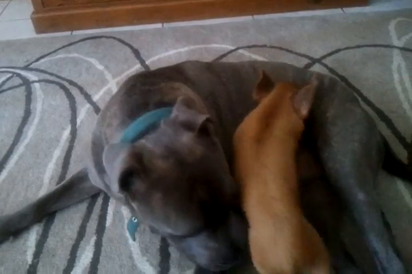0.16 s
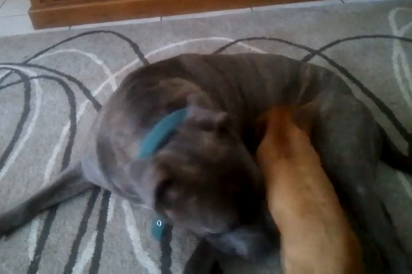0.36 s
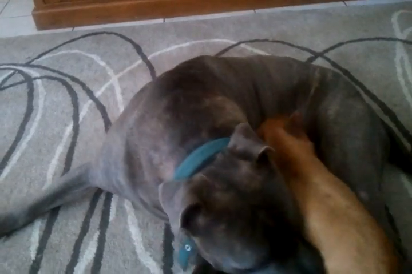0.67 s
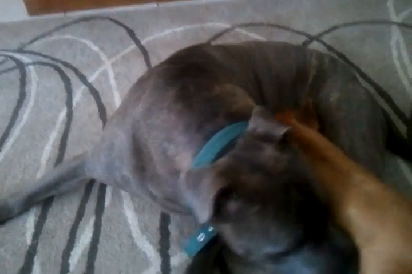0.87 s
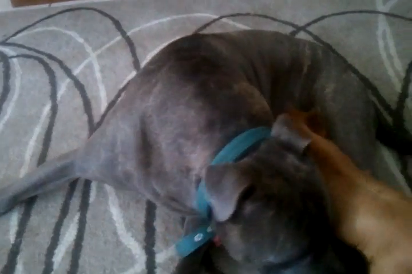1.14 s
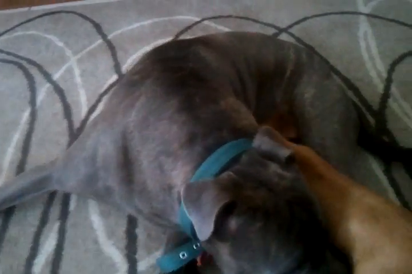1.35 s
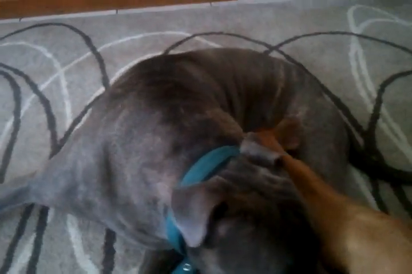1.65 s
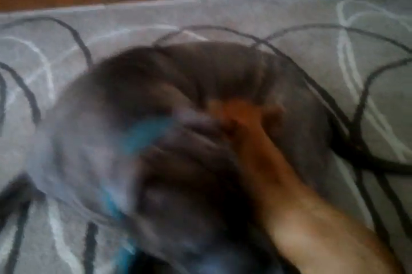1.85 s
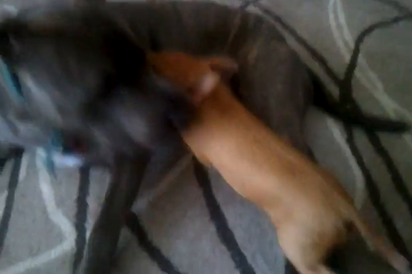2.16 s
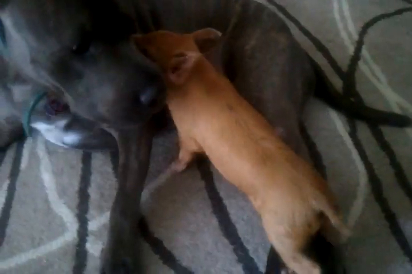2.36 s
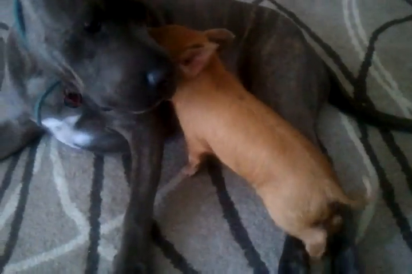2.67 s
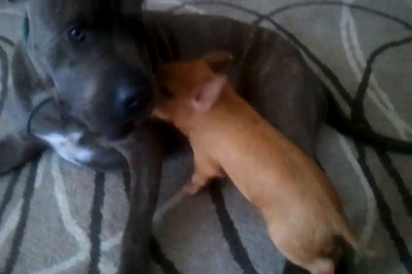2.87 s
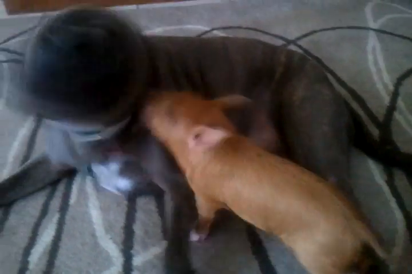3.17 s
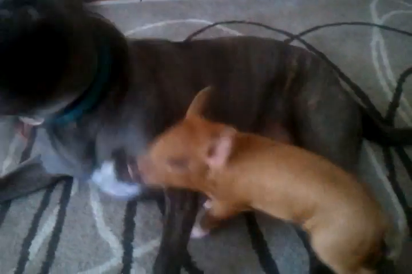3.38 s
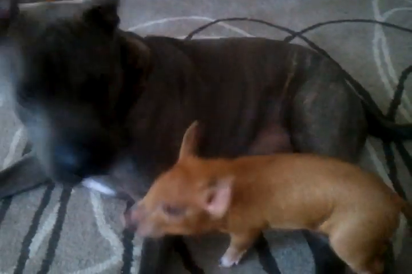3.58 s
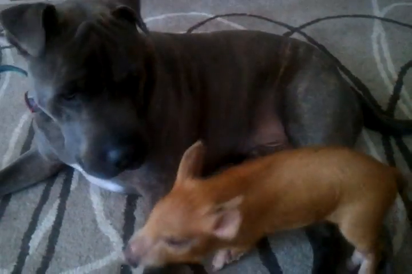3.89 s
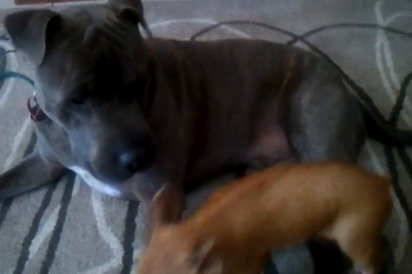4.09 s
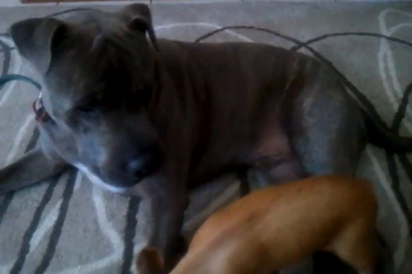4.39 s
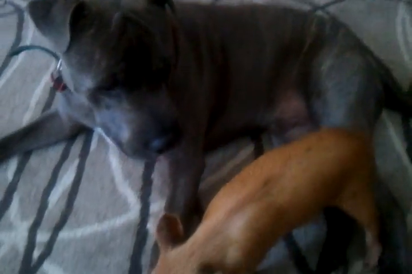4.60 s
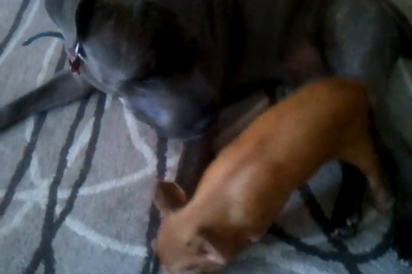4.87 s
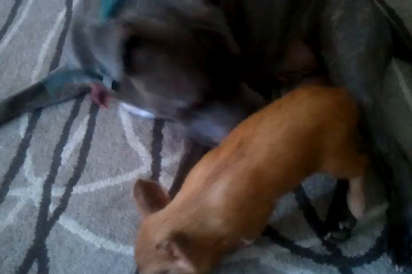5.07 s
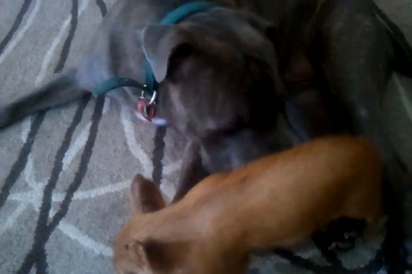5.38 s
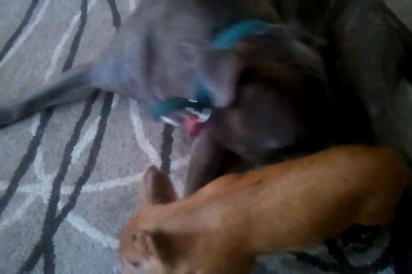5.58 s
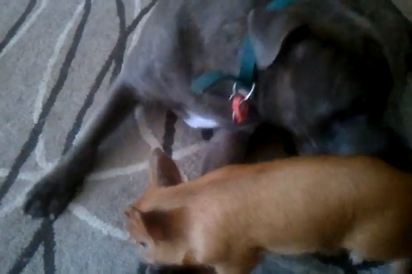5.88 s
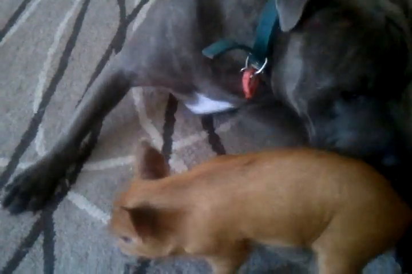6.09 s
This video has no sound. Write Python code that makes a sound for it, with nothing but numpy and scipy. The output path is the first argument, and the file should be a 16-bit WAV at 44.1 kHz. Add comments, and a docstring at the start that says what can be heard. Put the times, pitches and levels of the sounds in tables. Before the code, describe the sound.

Close, slightly muffled pickup indoors, with soft low rumble and faint high hiss. Gentle brushes of coat and snout come first, with small smacks, two soft paw thuds and scattered high tag clinks. A dog's head shake suddenly bursts out, flapping, whipping and jingling very loudly for about half a second with a short room echo. It dies into quiet, with faint clicks and smacks, and closes on several soft fur scuffs.

```python
"""A dog shakes its head: ears and jowls slap, the collar ring clanks and the metal tag jingles.
Before that a piglet nuzzles the dog on a living-room carpet; fur rubs and the tag ticks.
Fur is stick-slip noise, metal is a sum of decaying modes, and soft contacts are dying noise bursts.
The room rings briefly, over a low rumble and a thin high hiss, stronger during the nuzzling."""
import sys
import numpy as np
from scipy import signal
from scipy.fft import rfft, irfft, next_fast_len
from scipy.io import wavfile

SR = 44100
rng = np.random.default_rng(int(sys.argv[2]) if len(sys.argv) > 2 else 0)


def pcm_store(signal):
    """Save signal as 16-bit PCM."""
    levels = np.round(np.clip(np.atleast_2d(signal), -1, 1) * 32767)
    wavfile.write(sys.argv[1], SR, levels.astype(np.int16).T)


N = 275272
TIME = np.arange(N) / SR


def from_db(db):
    """Logarithmic level: 20 dB is a tenfold amplitude."""
    return 10 ** (np.asarray(db) / 20)


def rms_one(x):
    """Normalisation: scale to unit root-mean-square amplitude."""
    return x / np.sqrt(np.mean(x ** 2) + 1e-20)


def level(rows):
    """Level contour: straight lines in decibels between (time_s, level_db) rows, as a gain."""
    times_s, levels_db = np.transpose(rows)
    return from_db(np.interp(TIME, times_s, levels_db))


def add(out, s, sound):
    """Superposition: mix a short signal into out at time s."""
    at = int(np.clip(round(s * SR), 0, N - 1))
    out[at:at + len(sound)] += sound[:N - at]


def band(x, low_hz, high_hz, order=2):
    """Band limitation: a causal Butterworth band-pass."""
    edges = np.clip([low_hz, max(high_hz, low_hz * 1.1)], 10, .45 * SR)
    return signal.sosfilt(signal.butter(order, edges, "band", fs=SR, output="sos"), x)


def coloured(x, spectrum):
    """Spectral shaping: weight a steady excitation by frequency, then set unit rms."""
    hz, db = np.transpose(spectrum)
    size = next_fast_len(N)
    bins_hz = np.maximum(np.arange(size // 2 + 1) * SR / size, 1)
    gain = from_db(np.interp(np.log(bins_hz), np.log(hz), db))
    return rms_one(irfft(rfft(x, size) * gain, size)[:N])


# Low rumble and even hiss of the quiet room: frequency_hz, relative_level_db
FLOOR_SPECTRUM = [(18, -5), (32, 2), (48, 8.5), (63, 1), (82, 3), (170, -5.5), (300, -7), (560, -11.5),
                  (780, -12), (1200, -17), (2800, -21), (8000, -22.5)]
FLOOR_DB = -48.5


def room_floor():
    """Stationary noise: random pressure with a fixed spectrum, strongest in the bass."""
    return from_db(FLOOR_DB) * coloured(rng.standard_normal(N), FLOOR_SPECTRUM)


# Level of the thin high hiss, stronger during the nuzzling: time_s, level_db
HISS_LEVEL = [(0, -52.5), (1.4, -54.5), (2.0, -53), (2.6, -60.5), (4.3, -59.5), (6.24, -61.5)]
# Its spectrum: frequency_hz, relative_level_db
HISS_SPECTRUM = [(4000, -45.5), (5800, -13), (6700, -0.5), (8500, -13.5)]


def high_hiss():
    """Modulated noise: a narrow treble spectrum under a slowly moving level."""
    return level(HISS_LEVEL) * coloured(rng.standard_normal(N), HISS_SPECTRUM)


def friction(per_s, spread_db, smooth):
    """Stick-slip friction: hairs catch and slip as tiny uneven clicks on a smooth rush."""
    catches = rng.random(N) < per_s / SR
    sizes = rng.standard_normal(N) * from_db(spread_db * rng.standard_normal(N))
    return rms_one(catches * sizes) + smooth * rng.standard_normal(N)


# Light rubbing between strokes, busy while the piglet nuzzles: time_s, level_db
NUZZLE_LEVEL = [(0, -53), (1.45, -56), (1.8, -51.5), (2.4, -50.5), (2.6, -61.5), (5.3, -71), (6.24, -52.5)]
NUZZLE_WANDER_DB, NUZZLE_WANDERS_PER_S = 3, 12
# Spectrum of rubbed fur: frequency_hz, relative_level_db
RUB_SPECTRUM = [(100, -13.5), (350, -0.5), (750, -0.5), (1300, -4.5), (1900, -3), (2700, -9), (4300, -3),
                (5600, -5.5), (8000, -8)]
# A coat or snout brushes past, heard as a broad rub and a scuff in a band:
# middle_s, rub_level_db, length_s, scuff_low_hz, scuff_high_hz
BRUSH_STROKES = [(0.351, -45, 0.14, 700, 2150), (0.533, -52, 0.14, 600, 2000),
                 (0.801, -55, 0.22, 398, 1510), (1.145, -54, 0.074, 480, 1550),
                 (1.971, -44, 0.09, 500, 2000), (2.171, -48.5, 0.088, 4720, 5400),
                 (2.343, -49, 0.17, 780, 1980), (3.169, -55.5, 0.34, 3720, 5000),
                 (5.55, -57.5, .18, 2700, 5000), (5.92, -51, 0.065, 350, 860),
                 (6.002, -40.5, 0.068, 556, 2030), (6.076, -46.5, .05, 700, 2090),
                 (6.179, -47, 0.12, 900, 2200)]
SCUFF_DB = -3.5   # scuff level relative to the rub


def rubbing():
    """Friction noise: wandering light contact, with a swell for every stroke; powers add."""
    knots_s = np.arange(0, TIME[-1] + 1, 1 / NUZZLE_WANDERS_PER_S)
    wander = np.interp(TIME, knots_s, rng.standard_normal(len(knots_s)))
    power = (level(NUZZLE_LEVEL) * from_db(NUZZLE_WANDER_DB * wander)) ** 2
    for s, db, length_s, *_ in BRUSH_STROKES:
        swell = np.sin(np.linspace(0, np.pi, int(length_s * SR)))
        add(power, s - length_s / 2, (from_db(db) * swell) ** 2)
    fur = coloured(friction(per_s=3500, spread_db=1.0, smooth=1.02), RUB_SPECTRUM)
    return np.sqrt(power) * fur


def scuffs():
    """Band-limited friction: short noise strokes that swell and fade, each in its own band."""
    out = np.zeros(N)
    for s, db, length_s, low_hz, high_hz in BRUSH_STROKES:
        swell = np.sin(np.linspace(0, np.pi, int(length_s * SR)))
        rush = rms_one(band(rng.standard_normal(len(swell)), low_hz, high_hz, order=3))
        add(out, s - length_s / 2, from_db(db + SCUFF_DB) * swell * rush)
    return out


# Reverberation time, for a decay of 60 dB: frequency_hz, t60_s
REVERBERATION = [(100, 0.52), (1000, 0.51), (4000, 0.39), (8000, 0.55)]


def room(x, delay_s=0.0043):
    """Diffuse reverberation: noise bands decay at their own rates; response energy one half."""
    t, response = TIME[:SR * 3 // 4], 0
    edges_hz = np.geomspace(50, 12000, 9)
    for low_hz, high_hz in zip(edges_hz, edges_hz[1:]):
        t60 = np.interp(np.sqrt(low_hz * high_hz), *np.transpose(REVERBERATION))
        noise = band(rng.standard_normal(len(t)), low_hz, high_hz)
        response = response + noise * from_db(-60 * t / t60)
    # silent for one delay, then fading in over another
    response = response * np.clip(t / delay_s - 1, 0, 1)
    return signal.fftconvolve(x, response / np.sqrt(2 * np.sum(response ** 2)))[:N]


def blows(rows):
    """Damped impact: each contact is a dying burst in a band, its level that of the first instant."""
    out, t = np.zeros(N), TIME[:SR // 8]
    for s, db, low_hz, high_hz, decay_s in rows:
        fade = np.exp(-t / decay_s)
        burst = band(rng.choice([-1., 1.], len(t)) * fade, low_hz, high_hz, order=3)
        add(out, s, from_db(db) * rms_one(burst) * np.sqrt(np.mean(fade ** 2)))
    return out


# Mouths smack, and one higher tick: start_s, level_db, resonance_hz
SMACKS_AND_TICK = [(.385, -40, 4570), (.457, -36.5, 1780), (.957, -42.5, 1590), (1.093, -41, 720),
                   (4.6272, -43, 1840), (4.654, -48, 1850)]
SMACK_SPREAD, SMACK_DECAY_S = 1.204, 0.0044   # spread: ratio of band edge to resonance


def smacks_and_tick():
    """Resonance: a short burst in a band around a resonance."""
    return blows([(s, db, hz / SMACK_SPREAD, hz * SMACK_SPREAD, SMACK_DECAY_S)
                  for s, db, hz in SMACKS_AND_TICK])


def metal(modes, free_s, damp_s, left_db, buzz_db, rough):
    """Modal vibration: struck metal rings and buzzes on its neighbour, then fur damps it to a faint ring."""
    t = TIME[:SR // 4]
    rings = 0
    for hz, db, t60 in modes:
        sign = rng.choice([-1, 1])
        rings = rings + sign * from_db(db - 60 * t / t60) * np.sin(2 * np.pi * hz * t)
    wobble = 1 + rough * rms_one(band(rng.standard_normal(len(t)), 60, 320))
    buzz = from_db(buzz_db) * rms_one(band(rng.standard_normal(len(t)), 5550, 7400))
    free = np.exp(-np.maximum(t - free_s, 0) / damp_s)
    ringing = rings * wobble * np.maximum(free, from_db(left_db))
    return ringing + buzz * free * np.exp(-t / 0.034)


# The tag strikes its ring: start_s, level_db, pitch_hz, free_ringing_s
TAG_STRIKES = [(0.788, -37, 5940, 0.0067), (1.5469, -21.5, 5940, 0.0083), (1.600, -22, 5850, .0013),
               (1.614, -24, 5930, .001), (1.6286, -26, 6000, .003), (1.651, -26.5, 5950, 0.0028),
               (1.794, -36.5, 5900, 0.0062), (2.231, -20.5, 5990, 0.0032), (2.642, -27, 5920, 0.0017),
               (3.284, -38.5, 5980, .0045), (3.2983, -23.5, 5920, .002), (3.304, -24.5, 5980, 0.0027),
               (3.3194, -22.5, 6060, 0.0041), (3.3528, -9, 5820, .0015), (3.3553, -10.5, 6200, .001),
               (3.595, -26.5, 5990, 0.014), (3.7067, -24, 5940, 0.0056), (3.7399, -16, 6030, 0.017),
               (3.756, -21.5, 6030, 0.0095), (3.81, -20.5, 5870, 0.0048), (3.8258, -19, 5690, 0.0059),
               (3.8375, -20, 6070, .003), (3.905, -39, 5990, 0.012), (3.994, -32, 5900, 0.011),
               (5.752, -36.5, 5970, 0.029), (5.78, -38, 5970, .07), (5.991, -37.5, 5720, .033)]
# Modes of the tag while free: ratio_to_pitch, relative_level_db, t60_s
TAG_PARTIALS = [(.345, -20.5, .04), (0.736, -30.5, .06), (.958, -15.5, .1), (1.001, -2, 0.14),
                (1.011, -14, 0.11), (1.169, -28, .05)]
# bending mode: its level beside the strike, after a firm hit with this much free time
TAG_BEND_HZ, BEND_DB, FIRM_HIT_DB, BEND_FULL_S = 2474, -4, -18, 0.024
BEND_DB_PER_DB = .7   # the tag flexes more the harder it is hit


def tag_strikes(crack_db):
    """Modal excitation: a tiny crack starts each strike; hard hits and free time favour bending."""
    out, t = np.zeros(N), TIME[:SR // 100]
    for s, db, pitch_hz, free_s in TAG_STRIKES:
        freedom_db = 20 * np.log10(min(free_s / BEND_FULL_S, 1))
        bend_db = BEND_DB + BEND_DB_PER_DB * (db - FIRM_HIT_DB) + freedom_db
        modes = [(ratio * pitch_hz, mode_db, t60) for ratio, mode_db, t60 in TAG_PARTIALS]
        modes.append((TAG_BEND_HZ, bend_db, .13))
        ring = metal(modes, free_s, damp_s=0.0027, left_db=-36, buzz_db=-15.5, rough=0.11)
        add(out, s, from_db(db) * ring)
        crack = band(rng.standard_normal(len(t)) * np.exp(-t / 0.0013), 3000, 6900)
        add(out, s, from_db(db + crack_db) * crack)
    return out


# Small clicks, some of them cracks of the tag being struck: start_s, level_db, low_hz
SMALL_CLICKS = [(1.1782, -33.5, 6450), (1.258, -36, 5500), (1.741, -43, 6840), (1.7775, -32, 790),
                (2.3028, -36, 1000), (2.642, -36.5, 3370), (2.9087, -35.5, 4900), (5.229, -42, 2500),
                (5.751, -32, 2200), (5.843, -37, 4460), (6.2022, -42, 1200)]
CLICK_TOP_HZ, CLICK_DECAY_S = 8000, .0018


def clicks():
    """Hard contact: a brief impact spreads its energy over a wide band."""
    return blows([(s, db, low_hz, CLICK_TOP_HZ, CLICK_DECAY_S) for s, db, low_hz in SMALL_CLICKS])


# Paws land on the carpet: start_s, level_db
PAW_STEPS = [(1.712, -34), (1.779, -38)]
STEP_LOW_HZ, STEP_HIGH_HZ, STEP_DECAY_S = 130, 243, 0.0064


def steps():
    """Soft contact: a cushioned impact keeps only its low frequencies."""
    return blows([(s, db, STEP_LOW_HZ, STEP_HIGH_HZ, STEP_DECAY_S) for s, db in PAW_STEPS])


def swings(column, lag_s, rise_s, fall_db_per_s):
    """Power addition: each swing's gain rises to its peak, then decays exponentially."""
    power = 0
    for s, db in column:
        t = TIME - s - lag_s
        rise = np.clip(1 + t / rise_s, 0, 1)
        power = power + (rise * from_db(db - fall_db_per_s * np.maximum(t, 0))) ** 2
    return np.sqrt(power)


# The head swings to and fro: swish_peak_s, swish_level_db, chatter_level_db
HEAD_SWINGS = [(3.346, -26, -34), (3.45, -33, -41.5), (3.56, -32.5, -36), (3.735, -37, -28.5),
               (3.825, -43.5, -34)]
SWISH_RISE_S, SWISH_FALL_DB_PER_S = 0.054, 83
# the tag follows the head a little late
CHATTER_LAG_S, CHATTER_RISE_S, CHATTER_FALL_DB_PER_S = 0.02, 0.068, 170
# Spectrum of the fur swish: frequency_hz, relative_level_db
SWISH_SPECTRUM = [(60, -8), (120, 2), (250, -2), (550, -0.5), (1200, -1.5), (2500, 0), (4500, -1),
                  (7000, 2), (8500, -5.5)]


def fur_swish():
    """Friction noise: stick-slip of fur, swelling and dying with each head swing."""
    sweep = swings([(s, db) for s, db, _ in HEAD_SWINGS], 0, SWISH_RISE_S, SWISH_FALL_DB_PER_S)
    return sweep * coloured(friction(per_s=1600, spread_db=1.5, smooth=0.7), SWISH_SPECTRUM)


def tag_rattle(touches_per_s):
    """Random excitation: many light touches keep the tag's modes ringing unevenly."""
    t = TIME[:SR // 10]
    ring = sum(from_db(db - 60 * t / t60) * np.sin(2 * np.pi * ratio * 5970 * t)
               for ratio, db, t60 in TAG_PARTIALS)
    touches = (rng.random(N) < touches_per_s / SR) * rng.standard_normal(N)
    chatter = swings([(s, db) for s, _, db in HEAD_SWINGS],
                     CHATTER_LAG_S, CHATTER_RISE_S, CHATTER_FALL_DB_PER_S)
    return chatter * rms_one(signal.fftconvolve(touches, ring * np.exp(-t / 0.0086))[:N])


# Air pockets under the flapping jowls: start_s, level_db, start_hz, end_hz, length_s
JOWL_FLAPS = [(3.304, -34, 140, 180, 0.016), (3.381, -32, 95, 110, 0.026), (3.466, -32, 210, 327, 0.012),
              (3.477, -26, 395, 693, .025), (3.493, -35, 415, 330, 0.026), (3.719, -32.5, 293, 484, 0.03)]


def jowls(rough):
    """Cavity resonance: an air pocket under the lip slides in pitch as it changes size."""
    out = np.zeros(N)
    for s, db, start_hz, end_hz, length_s in JOWL_FLAPS:
        size = int(length_s * SR)
        phase = 2 * np.pi * np.cumsum(np.linspace(start_hz, end_hz, size)) / SR
        flutter = 1 + rough * rms_one(band(rng.standard_normal(size), 83, 250))
        swell = np.sin(np.linspace(0, np.pi, size))
        add(out, s, from_db(db) * swell * flutter * np.sin(phase))
    return out


# The flat of an ear or jowl slaps the head: start_s, level_db, low_hz, high_hz
FLAT_SLAPS = [(3.310, -14, 470, 2450), (3.326, -25.5, 250, 700), (3.3918, -10, 400, 1256),
              (3.403, -21.5, 392, 2010), (3.413, -24, 420, 790), (3.505, -26.5, 300, 1610),
              (3.6128, -23.5, 640, 985), (3.623, -26.5, 595, 2400), (3.735, -29.5, 332, 1400)]
SLAP_DECAY_S = .0037
SNAP_DB, SNAP_LOW_HZ, SNAP_HIGH_HZ = -5.5, 3700, 4760   # level relative to the slap


def slaps():
    """Broad impact: a dull slap of flat flesh carries a brighter snap of skin."""
    dull = [(s, db, low_hz, high_hz, SLAP_DECAY_S) for s, db, low_hz, high_hz in FLAT_SLAPS]
    snaps = [(s, db + SNAP_DB, SNAP_LOW_HZ, SNAP_HIGH_HZ, SLAP_DECAY_S) for s, db, *_ in FLAT_SLAPS]
    return blows(dull + snaps)


# Ear tips and strap whip against the head: start_s, level_db, low_hz, decay_s
EAR_WHIPS = [(3.3215, -25, 1800, .003), (3.3384, -16, 600, 0.0032), (3.3528, -10.5, 800, 0.0017),
             (3.3659, -6.5, 690, 0.0015), (3.377, -26, 2000, .002), (3.457, -19, 2020, .0023),
             (3.543, -15, 4500, 0.003), (3.551, -11.5, 1080, .002), (3.561, -16.5, 3000, 0.0016),
             (3.7306, -22, 3500, 0.0028), (3.736, -19.5, 1200, 0.0058), (3.809, -25, 810, 0.006),
             (3.8268, -20.5, 1040, 0.0025)]
WHIP_TOP_HZ = 8000


def whips():
    """Fast light impact: a short contact reaches far into the treble."""
    return blows([(s, db, low_hz, WHIP_TOP_HZ, decay_s) for s, db, low_hz, decay_s in EAR_WHIPS])


# The collar ring hits the buckle, once: start_s, level_db, time_until_damped_s
RING_HIT = (3.3381, -4.5, 0.0061)
# Modes of the ring while free: frequency_hz, relative_level_db, t60_s
RING_PARTIALS = [(6940, -1, 0.054), (4780, -4, 0.028), (7550, -12, .03), (4270, -11, 0.022)]


def ring_clank():
    """Modal vibration: the struck ring sounds its modes until it is abruptly damped."""
    out = np.zeros(N)
    s, db, free_s = RING_HIT
    ring = metal(RING_PARTIALS, free_s, damp_s=0.00072, left_db=-28.5, buzz_db=-20.5, rough=0.23)
    add(out, s, from_db(db) * ring)
    return out


def scene():
    """Superposition: collar, head shake, small contacts and background noise, with room echo."""
    jingle = tag_strikes(crack_db=-16) + ring_clank() + tag_rattle(touches_per_s=390)
    shake = whips() + slaps() + jowls(rough=0.74)
    small = smacks_and_tick() + clicks() + steps() + scuffs()
    fur = fur_swish() + rubbing()
    background = room_floor() + high_hiss()
    echo = room(from_db(-12) * jingle + from_db(-8.0) * shake + from_db(-6) * small)
    return (jingle + shake + small + fur + background + echo)[None]


ROLL_OFF_HZ, CUTOFF_HZ = 8250, 9000


def record(dry):
    """Band limitation and saturation: treble rolls off, peaks are rounded, the top ends steeply."""
    soft = signal.fftconvolve(dry, signal.firwin(71, ROLL_OFF_HZ, fs=SR)[None], "same")
    rounded = soft / (1 + (soft / .72) ** 6) ** (1 / 6)   # never exceeds 0.72
    steep = signal.ellip(10, .2, 80, CUTOFF_HZ, fs=SR, output="sos")
    return signal.sosfilt(steep, rounded)


dry = scene()
out = record(dry)
pcm_store(out)
```